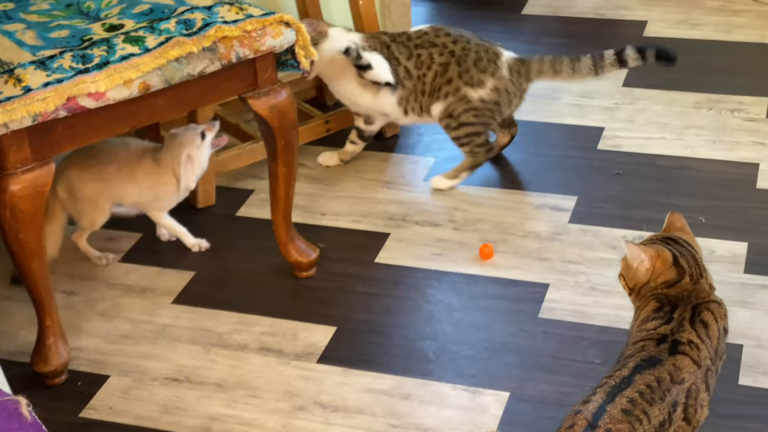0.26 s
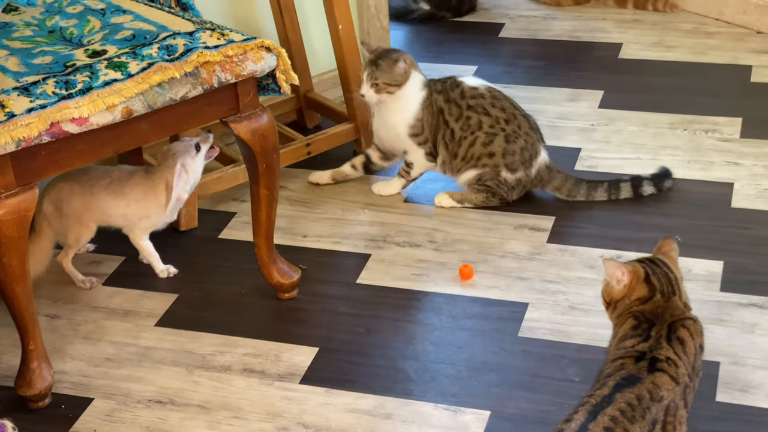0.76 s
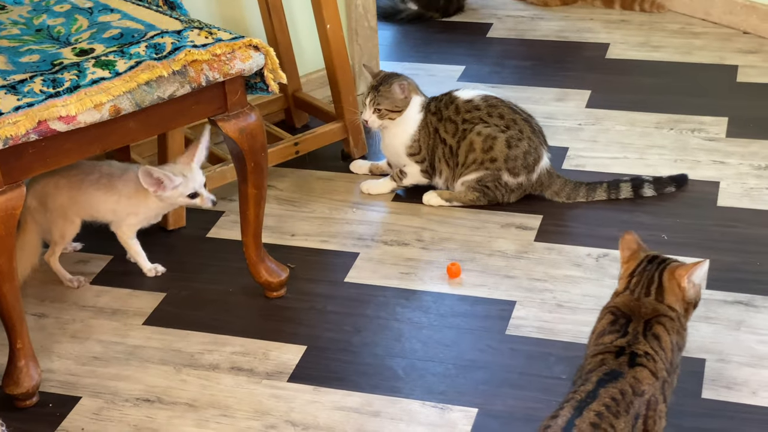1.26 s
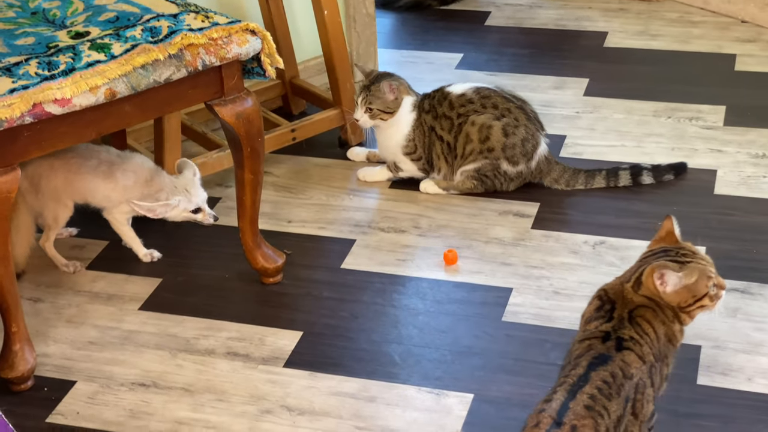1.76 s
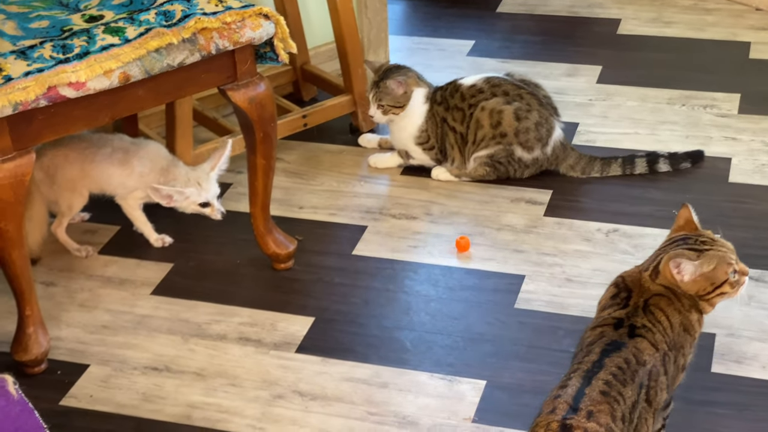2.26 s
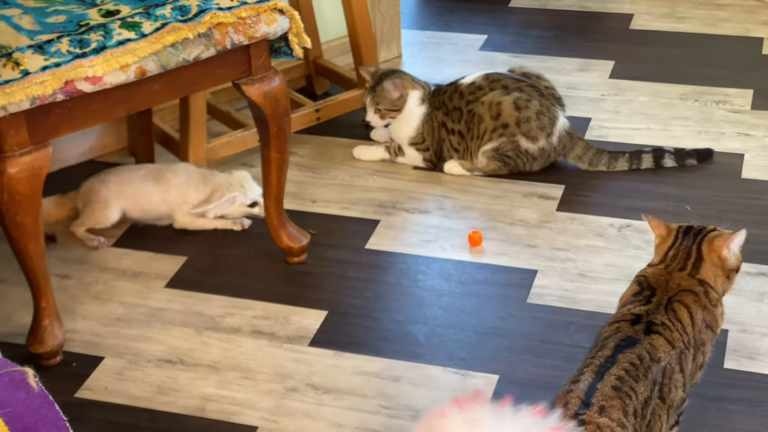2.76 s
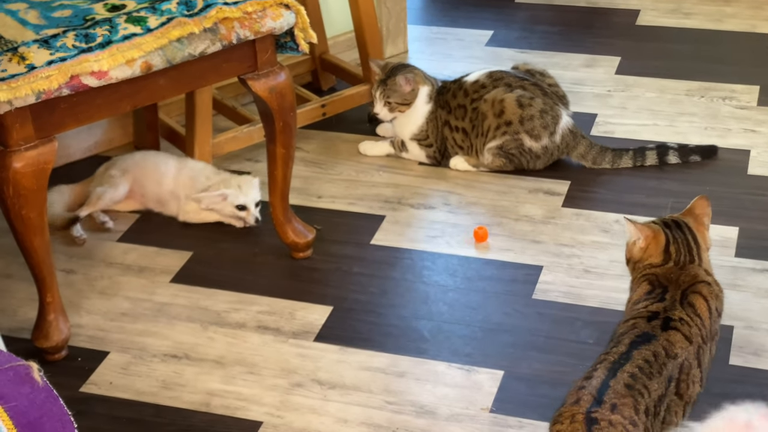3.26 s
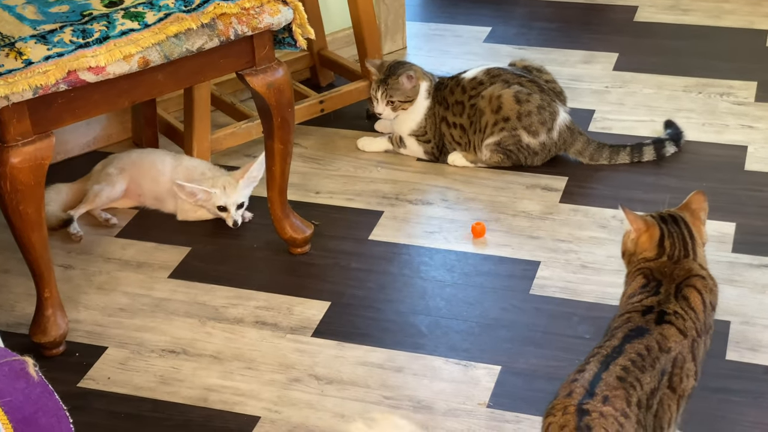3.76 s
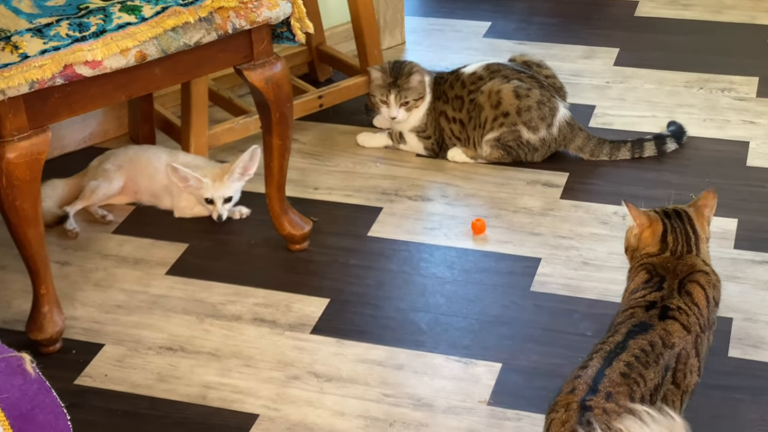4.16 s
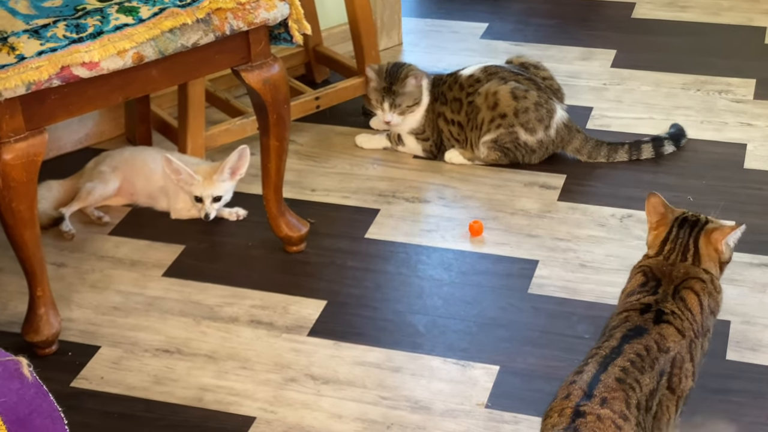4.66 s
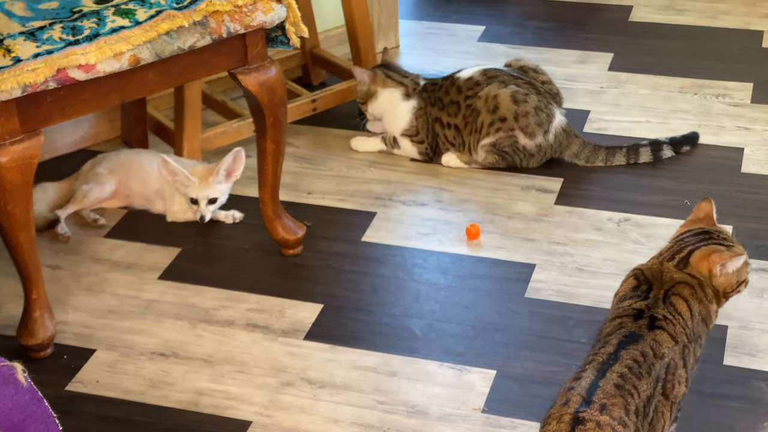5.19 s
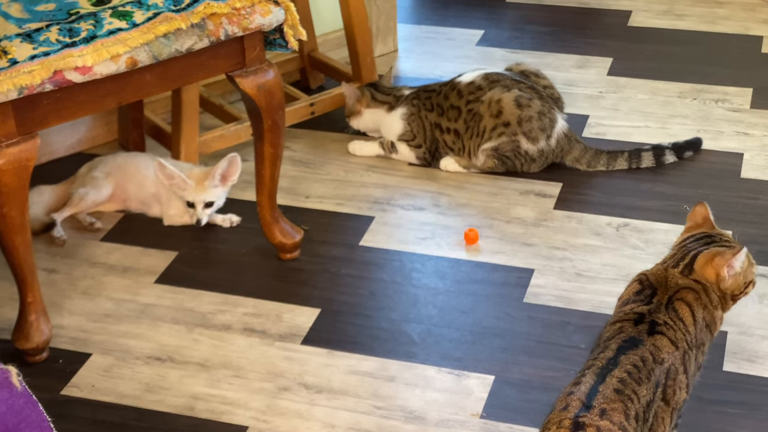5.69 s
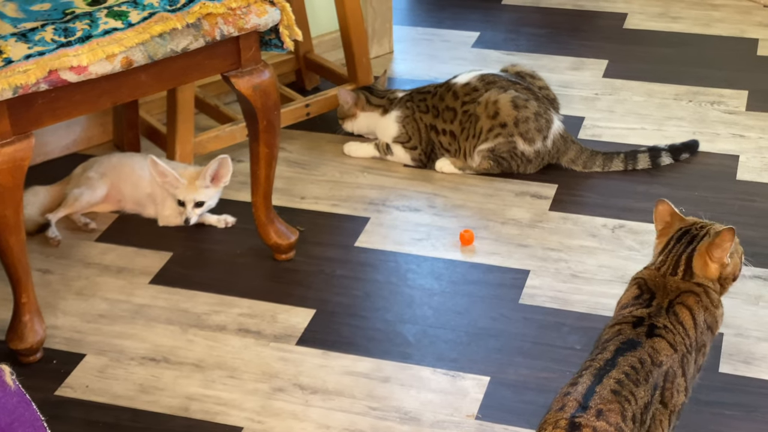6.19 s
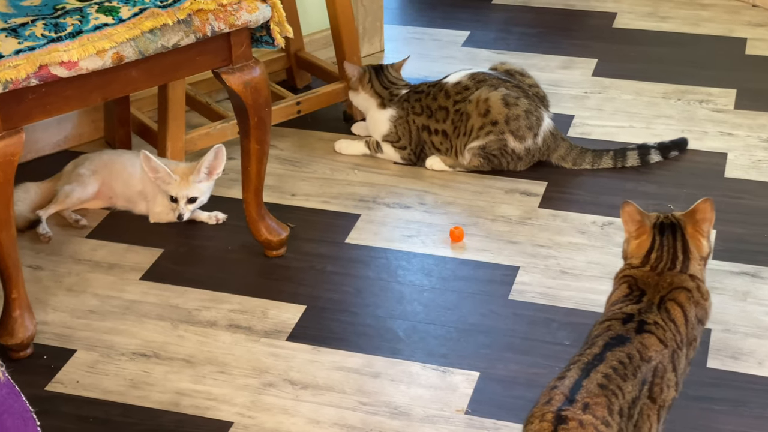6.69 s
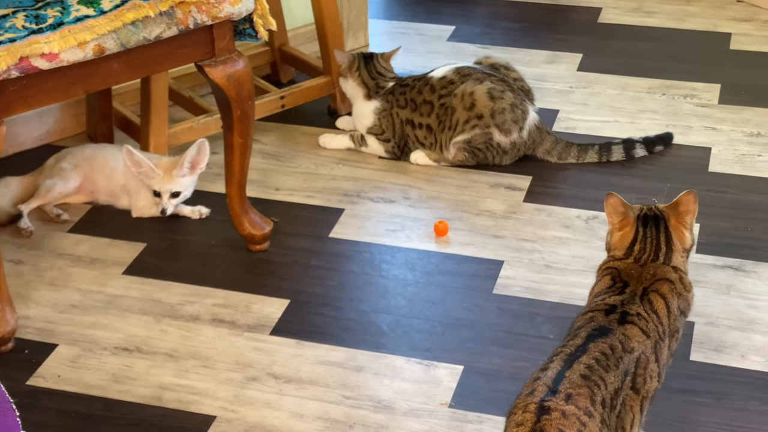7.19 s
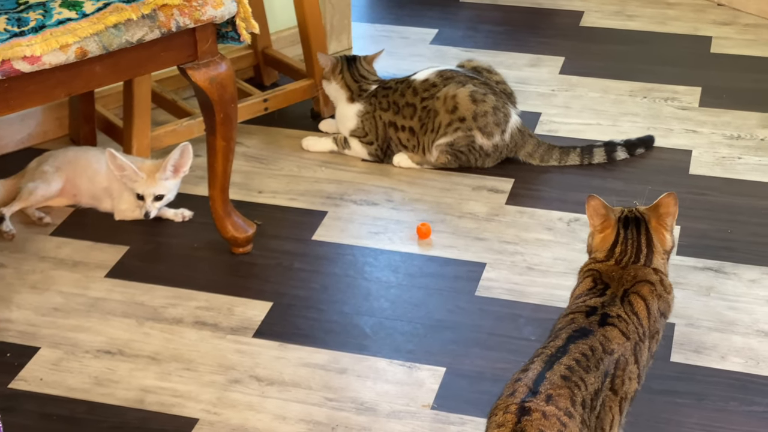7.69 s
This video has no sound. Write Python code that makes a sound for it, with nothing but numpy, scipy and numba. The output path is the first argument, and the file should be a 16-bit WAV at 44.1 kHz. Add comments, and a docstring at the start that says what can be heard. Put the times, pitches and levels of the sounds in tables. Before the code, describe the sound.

A small fox cries in a bare room with a hard floor, slightly left of a handheld stereo microphone. From 0 to 0.7 s come two loud, harsh squawks around 1 kHz, torn and breathy. A lower hoarse croak follows at 0.8-1.1 s with soft deep thumps below, then a faint whine and short croak at 1.5-1.9 s. Clearer, wavering whines sound at 2.25-2.95 s, a low grunt at 3.25 s, and short raspy yaps at 3.5-4.2 s. A thin, breathy squeal rises from 4.2 to 4.8 s, breaking into a sharp cough at 4.83 s and weaker coughs until 5.9 s. Two bright, falling yelps come at 6.1-6.5 s. Then near quiet: slight rustles, a tiny double claw tick near 7.1 s, a barely audible wheeze at 7.4 s. Short room reflections follow the cries; steady air noise, appliance hum and uneven deep rumble continue underneath.

```python
"""In a bare room with a hard floor, a small fox under a stool squawks, whines and coughs at two cats.
Its voice mixes an unsteady tone with a rasp of chaotic fold beats and breath, coloured by mouth and nose.
The room adds a fading tail of noise-like reflections to each cry, to the faint rustles and to the claw ticks.
Steady air noise, an appliance drone, rumble and soft footfalls lie below, made from filtered noise and
fading sines. A hand-held two-port microphone listens."""
import sys
import numpy as np
from scipy import signal
from scipy.fft import rfft, irfft
from scipy.io import wavfile
from scipy.ndimage import uniform_filter1d
from numba import njit

SR = 44100
rng = np.random.default_rng(int(sys.argv[2]) if len(sys.argv) > 2 else 0)


def dump_mix(stems):
    """Bounce the given channels to the path in sys.argv[1] as a 16-bit WAV at rate SR."""
    frames = np.atleast_2d(stems).T  # one column per channel
    limited = np.clip(frames, -1, 1)  # hard clip at full scale
    pcm = np.round(limited * 32767).astype(np.int16)
    wavfile.write(sys.argv[1], SR, pcm)


N = 350138   # length in samples

# The path of each cry, one list a cry: t/s, pitch f/Hz, rasp (effort) level/dB, clear tone level/dB
FOX_CRIES = [
    [(0.0, 1025, -21, -47), (0.056, 1024, -19, -33), (0.132, 989.6, -28.5, -42), (0.2, 1013, -21, -36.5),
     (0.27, 904, -30.5, -67)],
    [(0.395, 1050, -30.5, -55), (0.41, 1077, -20.5, -51), (0.427, 1100, -18, -40),
     (0.5, 1150, -18.5, -30.5), (0.53, 1046, -27.5, -47), (0.587, 1199, -18, -39), (0.69, 1156, -32.5, -52)],
    [(0.8, 470, -38, -43), (0.84, 458, -27.5, -52), (0.897, 454, -27.5, -45), (0.997, 429.4, -33, -44),
     (1.09, 400.3, -51, -44.5)],
    [(1.49, 735, -57.5, -79), (1.52, 752, -59, -51), (1.6, 852, -62, -57), (1.638, 878, -50, -53.5),
     (1.74, 783, -62, -48)],
    [(1.745, 405, -39, -53), (1.785, 417.8, -27.5, -46), (1.843, 417, -30.5, -67), (1.88, 398.2, -50, -38)],
    [(2.25, 598, -70.5, -46), (2.302, 603.4, -40.5, -28), (2.33, 705, -34, -26), (2.44, 686, -32.5, -43.5),
     (2.552, 689.3, -34.5, -50), (2.584, 691.4, -32.5, -27.5), (2.634, 606.3, -33.5, -21.5),
     (2.672, 561.6, -32, -35), (2.78, 594.5, -44, -41.5)],
    [(2.835, 573.4, -46, -33.5), (2.891, 711, -35.5, -23.5), (2.94, 699.6, -33.5, -31.5)],
    [(3.235, 480, -47, -32), (3.255, 485, -34, -52), (3.3, 432.6, -32, -46.5), (3.35, 355, -40.5, -50.5),
     (3.4, 335.8, -47, -46.5)],
    [(3.5, 723, -52, -36), (3.533, 710.4, -31, -38.5), (3.597, 713.8, -31.5, -21.5),
     (3.65, 726, -36.5, -55)],
    [(3.91, 734, -45, -60), (3.93, 721, -51, -60), (3.98, 725, -46, -51)],
    [(3.985, 642.4, -43.5, -45), (4.021, 660, -28.5, -32.5), (4.05, 748.5, -26.5, -31.5),
     (4.077, 764, -24.5, -27), (4.2, 767, -44, -49.5)],
    [(4.21, 1502, -40, -49), (4.3, 1585, -38.5, -52.5), (4.382, 1761, -39, -40.5), (4.47, 1720, -47, -37.5),
     (4.5, 1974, -47, -38), (4.6, 2022, -49, -36), (4.72, 2098, -53, -46.5), (4.82, 2040, -57, -57)],
    [(4.83, 1858, -35, -45), (4.84, 1860, -28, -33), (4.904, 1957, -36.5, -55), (4.94, 2029, -48, -52)],
    [(5.05, 1131, -46.5, -64), (5.066, 1130, -51.5, -48.5), (5.14, 1099, -52, -66)],
    [(5.29, 1821, -63, -73), (5.296, 1780, -49.5, -59), (5.36, 1854, -68, -58)],
    [(5.565, 1442, -40, -51), (5.575, 1479, -36.5, -46.5), (5.611, 1402, -49, -47.5),
     (5.66, 1378, -44, -57)],
    [(5.82, 1354, -58, -48.5), (5.85, 1275, -63.5, -64), (5.9, 1288, -58.5, -65)],
    [(6.08, 1270, -39.5, -29), (6.102, 1280, -28.5, -41), (6.15, 1320, -29, -24),
     (6.21, 1120, -30.5, -26.5), (6.27, 1090, -39, -35)],
    [(6.32, 1310, -38, -33), (6.41, 1200, -31, -22), (6.46, 1070, -35.5, -33), (6.5, 1050, -35.5, -30.5)],
    [(7.33, 1471, -81.5, -75), (7.37, 1490, -72, -64), (7.41, 1505, -67, -57), (7.46, 1560, -56.5, -63),
     (7.53, 1500, -65.5, -61), (7.6, 1450, -63, -69.5)],
]


def amp(db):
    """Turn decibels into a gain."""
    return 10 ** (np.asarray(db) / 20)


def rms_one(x):
    """Scale a sound to an rms of 1."""
    return x / np.sqrt(np.mean(x ** 2) + 1e-20)


def at_hz(points, hz):
    """Read a (f/Hz, value) table between its points, on a log-frequency axis."""
    points = np.array(points, float)
    return np.interp(np.log(hz + 1), np.log(points[:, 0] + 1), points[:, 1])


def band(x, low_hz, high_hz, order=2):
    """Keep the sound between two frequencies (Butterworth band-pass)."""
    return signal.sosfilt(signal.butter(order, [low_hz, high_hz], "band", fs=SR, output="sos"), x)


def noise():
    """White noise over the whole time."""
    return rng.standard_normal(N)


def drift(rate_hz):
    """Random wandering of rms 1: noise smoothed by two equal low-passes."""
    r = np.exp(-2 * np.pi * rate_hz / SR)
    wander = signal.lfilter([1], [1, -2 * r, r * r], rng.standard_normal(N + SR))
    return rms_one(wander[SR:])   # skip the first second, while the filter settles


@njit
def resonance(x, hz, width_hz, sr):
    """Two-pole resonance with a gain of about 1 at its centre, which may move."""
    out = np.zeros(len(x))
    r = np.exp(-np.pi * width_hz / sr)
    for i in range(2, len(x)):
        push = (1 - r * r) / 2 * (x[i] - x[i - 2])
        swing = 2 * r * np.cos(2 * np.pi * hz[i] / sr) * out[i - 1]
        out[i] = push + swing - r * r * out[i - 2]
    return out


def ring(x, hz, width_hz):
    """A resonance that stays put."""
    return resonance(x, np.full(len(x), float(hz)), float(width_hz), SR)


def fox():
    """Vibrating folds give tone and rasp; mouth and nose colour the rasp, and coughs add chesty puffs."""
    # How the folds move, one row a cry: pitch wobble [share of pitch], unevenness of the fold beats/dB,
    # breath share [0-1], line at 1/2 the pitch [share of tone; the line at 3/2 is four times as strong]
    voices = [(.03, 3, .8, 0), (.04, 3, .8, 0), (.01, 2, .6, 0), (.02, 3, .85, 0), (.015, 2, .65, 0),
              (.02, 2.5, .65, 0), (.014, 2.5, .6, 0), (.012, 3, .45, 0), (.02, 3, .65, 0), (.05, 3, .95, 0),
              (.022, 3, .7, 0), (.04, 2, .97, 0), (.08, 3, .85, 0), (.06, 3, .85, 0), (.05, 3, .85, 0),
              (.1, 3, .9, 0), (.1, 3, .9, 0), (.06, 3, .75, .09), (.06, 3, .75, .09), (.05, 3, .97, 0)]
    # Colour of the voice, one row a cry: partials 1, 2, 3 level/dB re tone, partials 4 and 5 level/dB re tone,
    # mouth resonance at start f/Hz, at end f/Hz, treble at greatest effort level/dB re rasp,
    # broad 3.6 kHz cavity level/dB re mouth resonance, top band level/dB re lower treble,
    # wheeze level/dB re mouth resonance
    colours = [ (-2, -6, -5, -16, 3970, 3300, -4.5, -19.5, 1, -7),
               (-12.5, -3, -14, -8, 3480, 2900, -7, -13.5, -0.5, -9),
               (-40, -13, -6, -2.5, 3250, 2750, -11.5, -15.5, 5, -4),
               (4.5, -5, -12.5, -18, 3200, 3500, -34, -22, -2, -13.5),
               (-25, -1, -2, -13, 3450, 2800, -14, -20, 5, -6.5),
               (2, 0.5, -4, -9, 3500, 2200, -6.5, -23.5, 4, 6.5),
               (-1.5, 2, -20, -23, 2360, 2000, -7.5, -28.5, -8.5, 0.5),
               (-25, 1, -5, 0.5, 2600, 1250, -19.5, -22.5, 11.5, -18.5),
               (1, 1, -14, -15.5, 1720, 1400, -21.5, -11, 5.5, -5),
               (6.5, -7, -12, -8, 2500, 2100, -20, -29, 3, -4),
               (0.5, 5.5, -16, -28, 1670, 1300, -17.5, -25.5, -6.5, -3),
               (-0.5, -7.5, -14, -28, 1650, 1460, -14.5, -38.5, -4.5, -1),
               (-6, -18, -25, -31, 1810, 1990, -21.5, -26.5, -3, -10.5),
               (0, -18.5, -21, -22, 2600, 2030, -19, -23, -5.5, -20),
               (2.5, -34, -33, -35, 1400, 1600, -40, -30, -4, -27),
               (2, -10, -13, -8.5, 2600, 2100, -16.5, -20.5, -2, -2.5),
               (2, -14, -23, -27, 2300, 1600, -7, -25.5, -7.5, 2),
               (-1, -22, -21, -30, 1770, 1500, -11, -27, -5.5, -11),
               (-1, -22, -23, -31, 1920, 890, -14, -26.5, -16.5, -13),
               (-0.5, -13, -5, -11.5, 5400, 2200, 0, -23, -15, 8.5)]
    gate, turn, progress, (hz, rasp_db, tone_db) = laid_out(rise_s=0.0025, fall_s=0.0075)
    wobble, uneven_db, breath, half = np.array(voices)[turn].T
    *partials_db, from_hz, to_hz, treble_db, cavity_db, top_db, wheeze_db = np.array(colours)[turn].T
    partials_db.append(partials_db[-1])   # partial 5 is as strong as partial 4
    mouth_hz = from_hz + (to_hz - from_hz) * progress

    # weaker effort dulls the voice: 0.74 dB less treble, re rasp, for each dB below the cry's loudest moment
    loudest_db = np.array([max(row[2] for row in rows) for rows in FOX_CRIES])[turn]
    treble_db = rasp_db + treble_db + 0.74 * (rasp_db - loudest_db)

    turns = np.cumsum(hz * (1 + wobble * drift(120))) / SR   # fold cycles so far
    cycle = 2 * np.pi * turns
    hiss = rms_one(noise() * (0.13 + (1 + np.cos(cycle)) ** 2 / 4))   # air escapes once a cycle
    puffs = fold_puffs(hz, turns, uneven_db, breath, hiss)
    tone = clear_tone(cycle, partials_db, half) * amp(uneven_db * drift(70))   # strength flutters too
    tone += breath_clouds(hiss, hz, partials_db, breath)
    tone *= uniform_filter1d(gate, size=800) ** 2   # the folds take a few cycles to settle
    mouth = mouth_sound(puffs, mouth_hz, cavity_db, wheeze_db)
    nose = nose_sound(puffs, hiss, top_db)

    voice = amp(tone_db) * tone + amp(rasp_db) * rms_one(mouth) + amp(treble_db) * rms_one(nose)
    # a small head radiates no bass
    return band(gate * voice, 470, 16000, order=4) + chest_puffs()


def laid_out(rise_s, fall_s):
    """Give a gate open during each cry, the cry's number, its progress (0-1) and its pitch and levels."""
    t, gate, turn = np.arange(N) / SR, np.zeros(N), np.zeros(N, int)
    for k, rows in enumerate(FOX_CRIES):
        start, end = rows[0][0], rows[-1][0]
        opening = (t - start) / rise_s
        closing = (end - t) / fall_s + 1
        gate = np.maximum(gate, np.clip(np.minimum(opening, closing), 0, 1))
        turn[t >= start] = k
    start, end = np.array([(rows[0][0], rows[-1][0]) for rows in FOX_CRIES])[turn].T
    progress = np.clip((t - start) / (end - start), 0, 1)
    s, *columns = np.concatenate(FOX_CRIES).T
    return gate, turn, progress, [np.interp(t, s, c) for c in columns]


def clear_tone(cycle, partials_db, half):
    """Regular fold motion: five partials, plus lines at 1/2 and 3/2 of the pitch in some cries."""
    partials = sum(amp(db) * np.sin(k * cycle) for k, db in enumerate(partials_db, 1))
    return partials + half * (np.sin(cycle / 2) + 4 * np.sin(3 * cycle / 2))


def fold_puffs(hz, turns, uneven_db, breath, hiss):
    """Chaotic folds let out pulses of uneven force, mixed with breath."""
    top_hz, most = 9000, 21   # pulses hold at most 21 partials, all below 9 kHz
    cycle = 2 * np.pi * turns
    beats = sum(np.cos(k * cycle) * (k * hz < top_hz) for k in range(1, most + 1))
    beats /= np.sqrt(np.minimum(top_hz / hz, most) / 2)   # even out the power at all pitches
    force = np.clip(rng.standard_normal(N), -2, 2)[np.round(turns).astype(int)]   # one draw a beat
    beats *= amp(uneven_db * force)
    flutter = amp(2 * np.clip(drift(180), -2, 2))
    return (np.sqrt(1 - breath ** 2) * beats + breath * hiss) * flutter


def breath_clouds(hiss, hz, partials_db, breath):
    """Escaping air rings around each low partial; the clouds weaken as the voice clears."""
    # Width of the cloud around partials 1 to 5: width f/Hz
    cloud_widths = (329, 454, 550., 650., 750.)
    clouds = np.zeros(N)
    for k, db in enumerate(partials_db):
        once = resonance(hiss, (k + 1) * hz, cloud_widths[k], SR)
        cloud = rms_one(resonance(once, (k + 1) * hz, cloud_widths[k], SR))
        clouds += amp(db + 4 - 60 * (1 - breath)) * cloud   # 7 dB over the partial's power when all breath
    return clouds


def mouth_sound(puffs, mouth_hz, cavity_db, wheeze_db):
    """A moving mouth resonance, wheezing turbulence at the teeth and a broad cavity behind them."""
    once = resonance(puffs, mouth_hz, 1300.0, SR)
    mouth = rms_one(resonance(once, mouth_hz, 1800.0, SR))
    wheeze = rms_one(band(noise(), 1400, 4620))
    cavity = rms_one(ring(puffs, 3560, 2700))
    return band(mouth + amp(wheeze_db) * wheeze + amp(cavity_db) * cavity, 900, 5100, order=3)


def nose_sound(puffs, hiss, top_db):
    """Fold puffs and extra breath ring in fixed cavities and give the treble."""
    # Cavities that stay put: f/Hz, width f/Hz, level/dB
    cavities = [(5090, 760, 6.5), (6950, 1900, 8), (9370, 950, -3)]
    air = puffs + amp(18.5) * hiss
    nose = sum(amp(db) * (-1) ** k * ring(air, f, w) for k, (f, w, db) in enumerate(cavities))
    nose = nose + amp(-4.0) * air   # some air passes without ringing
    return band(nose, 5430, 8640, order=3) + amp(top_db) * band(nose, 7335, 11010, order=3)


def chest_puffs():
    """A chesty puff under a cough: low noise that starts at once and dies away."""
    # Puffs: start t/s, starting level/dB, time to fall 60 dB t/s
    coughs = [(4.833, -36, 0.21), (5.296, -51, 0.2), (5.565, -40.5, 0.25)]
    chest = np.zeros(N)
    for s, db, t60 in coughs:
        age = np.arange(N) / SR - s
        chest += amp(db - 60 * np.maximum(age, 0) / t60) * (age > 0)
    return chest * rms_one(band(noise(), 279.5, 970))


def small_noises():
    """Grainy brushes of noise that swell fast and fade slowly, and filtered clicks for a claw."""
    # Fur and cloth brushes: peak t/s, level there before the grainy flutter/dB
    rustles = [(1.27, -69), (5.86, -73.5), (6.05, -75.5), (7.03, -72.5), (7.09, -81.5), (7.25, -82.5),
               (7.46, -73.5)]
    # Claw on the floor: t/s, click level before its band-pass/dB
    ticks = [(7.083, -53.5), (7.0994, -54)]
    rise_db_per_s, fade_db_per_s = 250, 57
    t = np.arange(N) / SR
    brushes = np.zeros(N)
    for s, db in rustles:
        brushes += amp(db - np.maximum(rise_db_per_s * (s - t), fade_db_per_s * (t - s)))
    rustle = brushes * amp(3.5 * drift(47)) * rms_one(band(noise(), 3400, 13000))
    clicks = np.zeros(N)
    for s, db in ticks:
        clicks[round(s * SR)] = amp(db)
    return rustle + band(clicks, 5000, 12000)


def room(x, wet_db):
    """Dense reflections: noise dying at its own pace in each band, wider in some bands than in others."""
    # How long the room rings: f/Hz, time to fall 60 dB t/s
    room_t60 = [(300, 0.97), (800, 0.69), (2100, 0.59), (5500, 0.54), (11000, 0.47)]
    # How wide the room sounds: f/Hz, side re mid level/dB
    room_side = [(300, -12), (700, -10), (1300, -2), (2500, -9), (5000, -12), (9000, -5)]
    t = np.arange(int(.9 * SR)) / SR
    edges = 200 * 2 ** np.arange(0, 6.6, .5)   # half-octave bands from 200 Hz
    tail = 0
    for low, high in zip(edges, edges[1:]):
        hz = np.sqrt(low * high)
        t60 = at_hz(room_t60, hz)
        even_power = np.sqrt(2 * np.log(1000) / t60 / SR)   # long and short tails carry like energy
        dying = amp(-60 * t / t60) * np.clip(t / 0.0047, 0, 1) * even_power
        width = [[1], [amp(at_hz(room_side, hz))]]
        tail = tail + band(rng.standard_normal((2, len(t))), low, high) * dying * width
    mid, side = amp(wet_db) * signal.fftconvolve(x[None], tail, axes=1)[:, :N]
    return np.array([mid + side, mid - side])


def house():
    """Steady air noise, an appliance drone, and low shaking of the floor."""
    drone = appliance_drone() * amp([[-2], [1.5]])   # stronger on the right
    low = rumble() + footfalls()
    apart = amp(-18) * np.roll(low, SR // 200)   # part shakes the two ports against each other, 5 ms later
    return air_noise() + drone + np.array([low + apart, low - apart])


def air_noise():
    """Steady noise shaped by a spectrum, mostly the same in both ears."""
    # Shape of the spectrum: f/Hz, relative level per Hz/dB
    house_air = [(44, -29), (75, -8), (143, -12), (280, -13), (430, -18), (621, -13.5), (804, -18.5),
                 (1040, -24.5), (1350, -24.5), (1570, -28), (1870, -28), (2870, -35), (13000, -49)]
    hz = np.fft.rfftfreq(N, 1 / SR)
    shape = amp(at_hz(house_air, hz)) * (hz > 85)
    mid, side = irfft(rfft(rng.standard_normal((2, N))) * shape, N)
    side *= amp(-13)
    return amp(-55.5) * rms_one(np.array([mid + side, mid - side]))


def appliance_drone():
    """Noise ringing in narrow resonances makes an unsteady hum."""
    # Lines of the drone: f/Hz, width f/Hz, level before the left-right balance/dB
    hum = [(102.3, 4.4, -61), (193, 9.06, -67.5), (240.8, 7.1, -62), (284.5, 8.24, -61)]
    return sum(amp(db) * rms_one(ring(noise(), f, w)) for f, w, db in hum)


def rumble():
    """Two bands of deep noise whose level rises and falls, with small random lumps."""
    # Level of the stronger band before the lumps: t/s, level/dB
    rumble_path = [(0.0, -61), (0.78, -68), (0.91, -45), (1.13, -45), (1.25, -51), (4.3, -50.5),
                   (6.15, -48), (6.8, -54.5), (7.74, -49)]
    shake = rms_one(band(noise(), 42, 61, order=3)) + amp(-7) * rms_one(band(noise(), 20, 38))
    level_db = np.interp(np.arange(N) / SR, *np.transpose(rumble_path))
    return amp(level_db - 0.5 * drift(3.9)) * shake


def footfalls():
    """Soft footfalls through the floor: low sines that swell in and die away."""
    # Thumps: start t/s, starting level of the decay before the swell/dB, f/Hz, time to fall 60 dB t/s
    thumps = [(0.88, -17.5, 54.7, 0.22), (1.03, -19.5, 66.6, 0.1), (4.518, -30.5, 198.3, 0.19)]
    low = np.zeros(N)
    for s, db, f, t60 in thumps:
        age = np.maximum(np.arange(N) / SR - s, 0)
        swell = np.clip(age / 0.063, 0, 1)
        low += amp(db - 60 * age / t60) * swell * np.sin(2 * np.pi * f * age)
    return low


def scene():
    """Fox and small noises, slightly left, with the room's reflections, over the house."""
    near = fox() + small_noises()
    return near * amp([[.5], [-.5]]) + room(near, wet_db=-1.5) + house()


def record(dry):
    """The two ports hear the treble out of step; the sound gets much weaker above about 12.5 kHz
    and is almost silent above 15.9 kHz."""
    # Phase between the ports: f/Hz, lead of left over right [radians]
    ports = [(0, 0), (860, -.5), (1290, -.2), (2930, .35), (7750, -.2), (8270, 1.6), (8700, 2.2),
             (9560, 1.5), (10400, .2), (11600, -.5), (12300, -2.6)]
    lead = np.exp(.5j * at_hz(ports, np.fft.rfftfreq(N, 1 / SR)))   # half the lead on each side
    out = irfft(rfft(dry) * [lead, lead.conj()], N)
    out = signal.sosfilt(signal.cheby2(10, 30, 13300, fs=SR, output="sos"), out)
    return signal.sosfilt(signal.cheby2(12, 70, 15900, fs=SR, output="sos"), out)


dry = scene()
out = record(dry)
dump_mix(out)
```